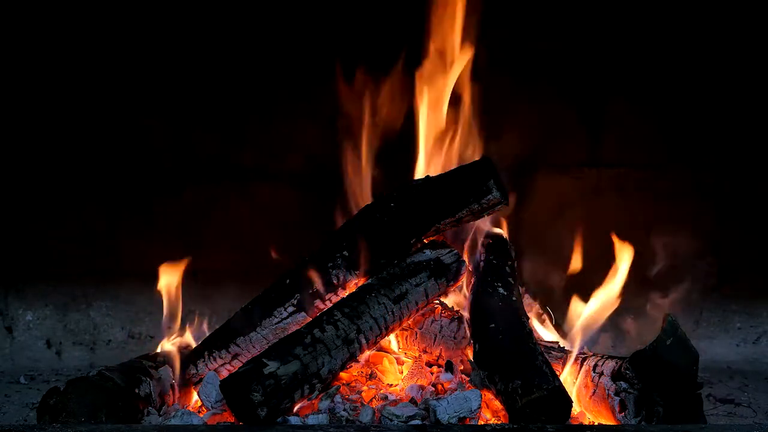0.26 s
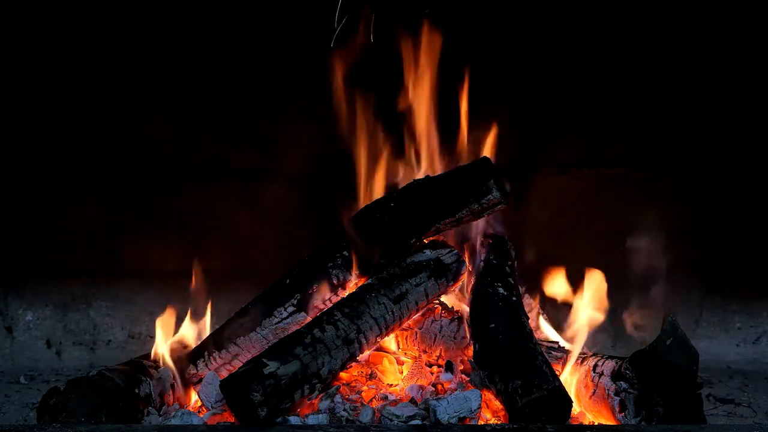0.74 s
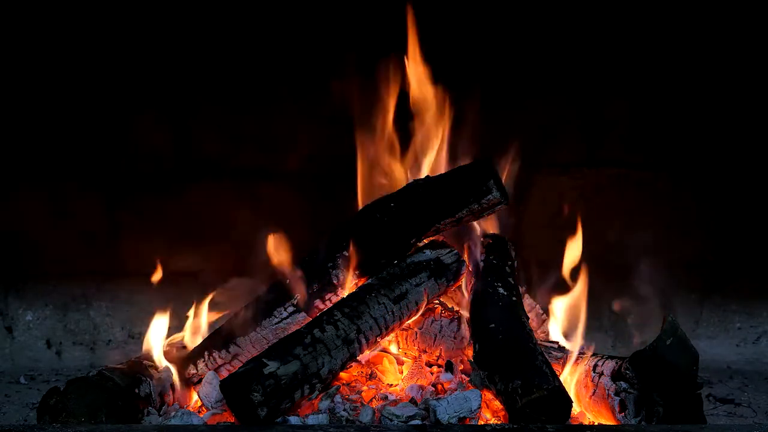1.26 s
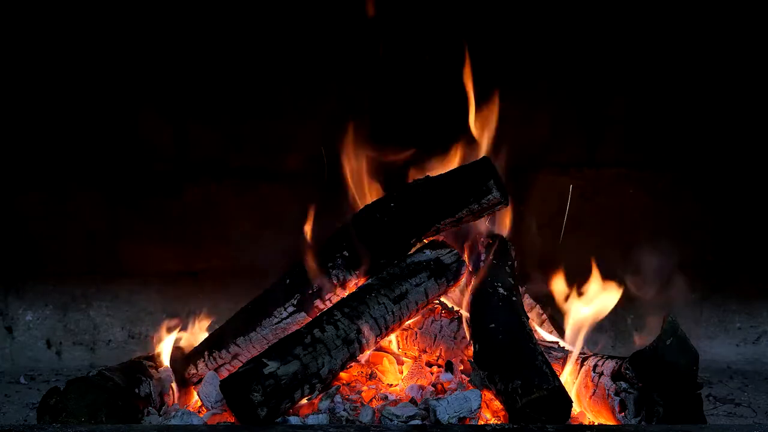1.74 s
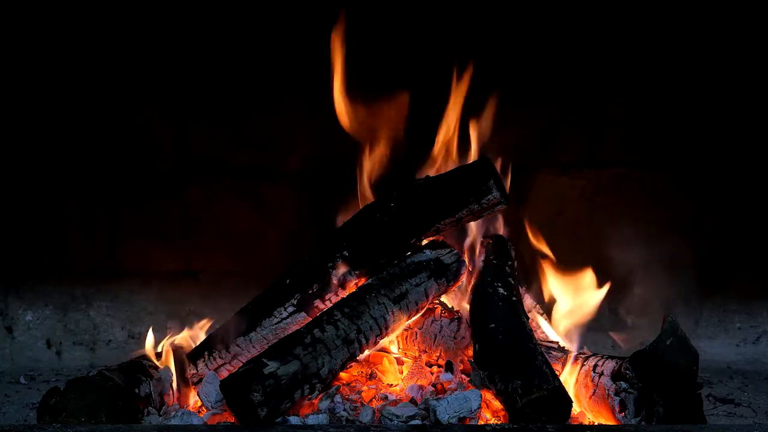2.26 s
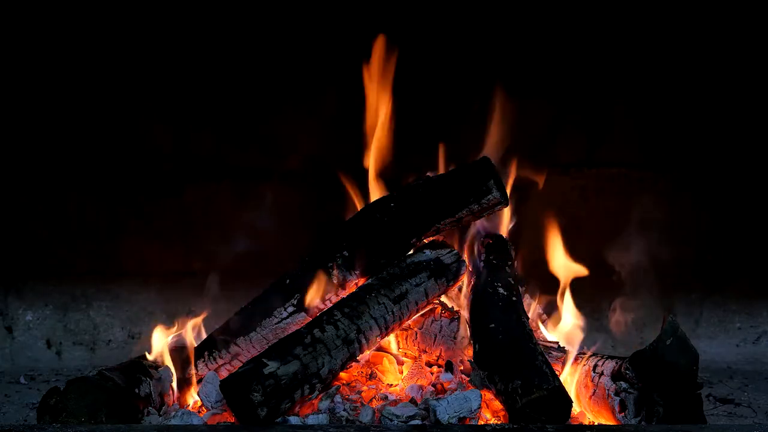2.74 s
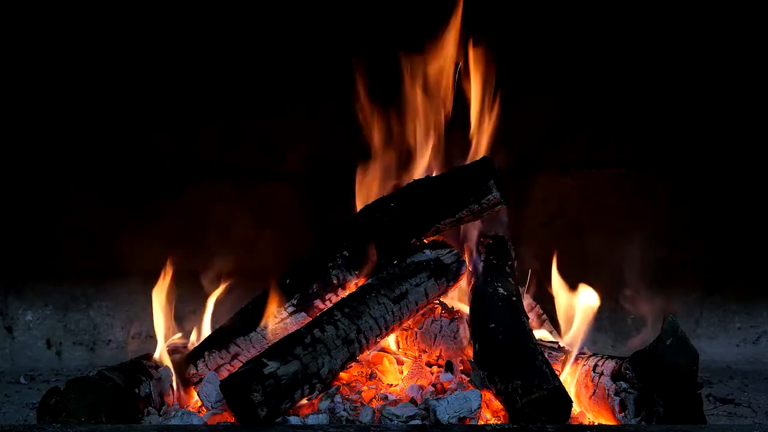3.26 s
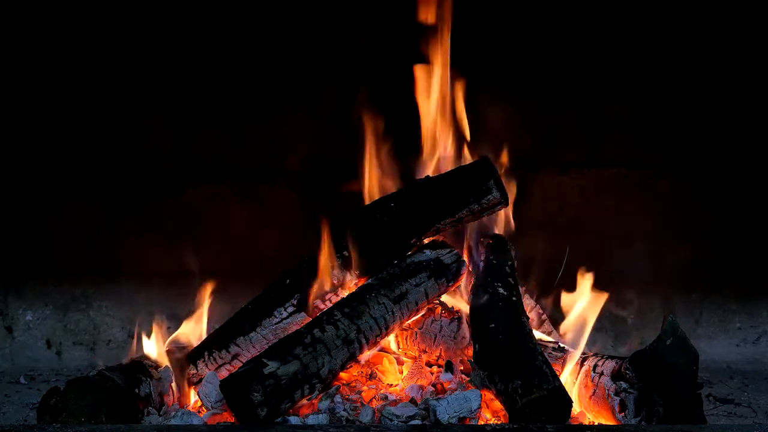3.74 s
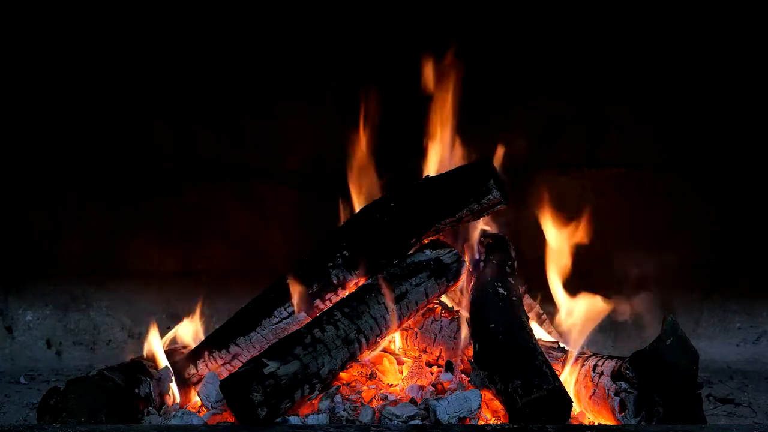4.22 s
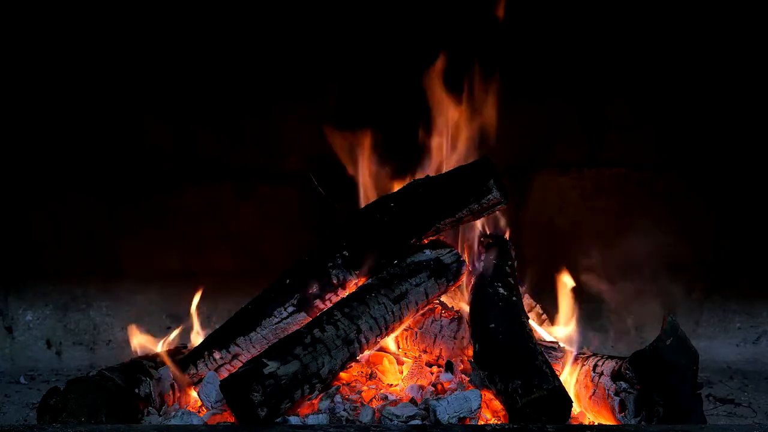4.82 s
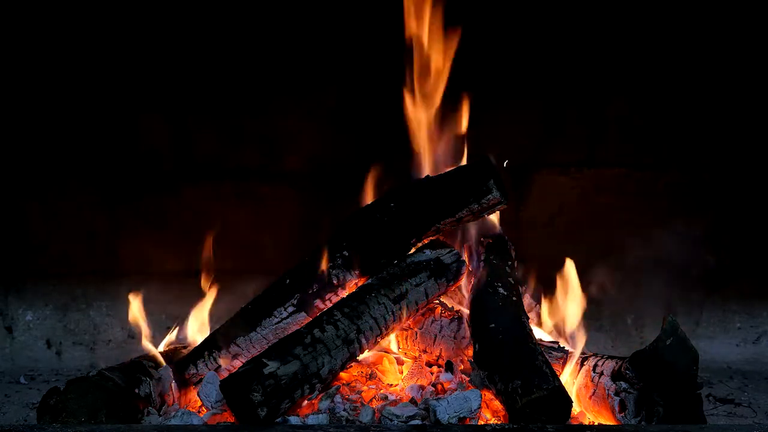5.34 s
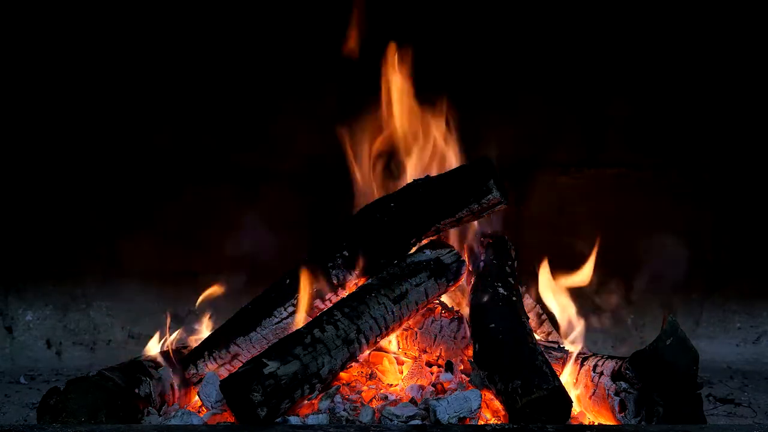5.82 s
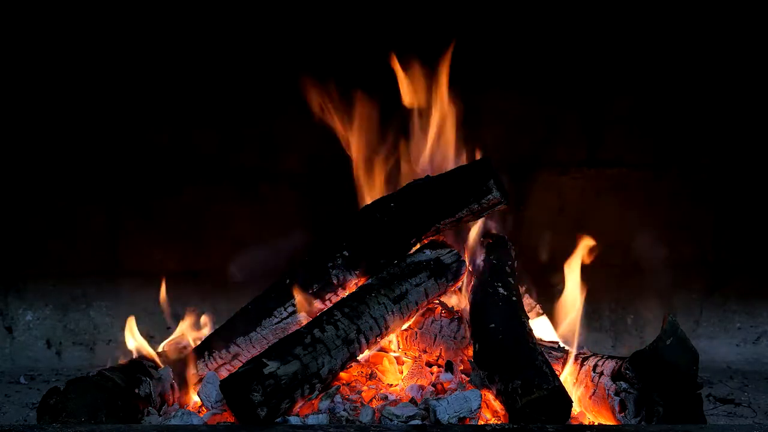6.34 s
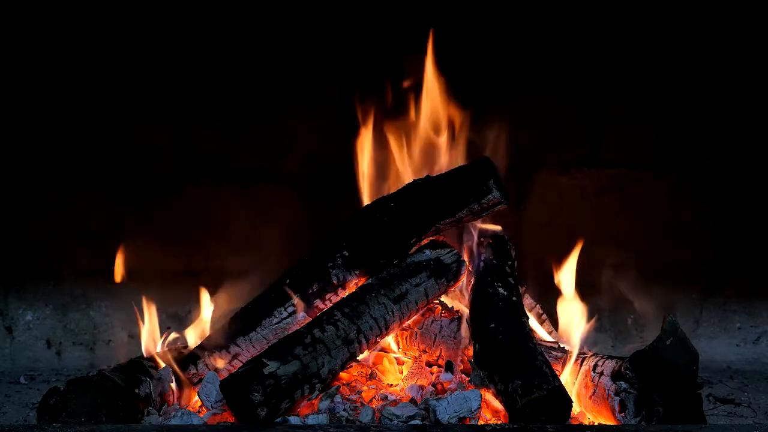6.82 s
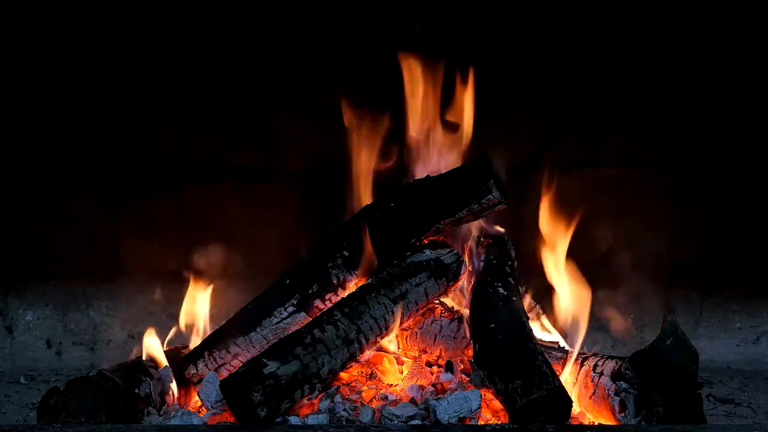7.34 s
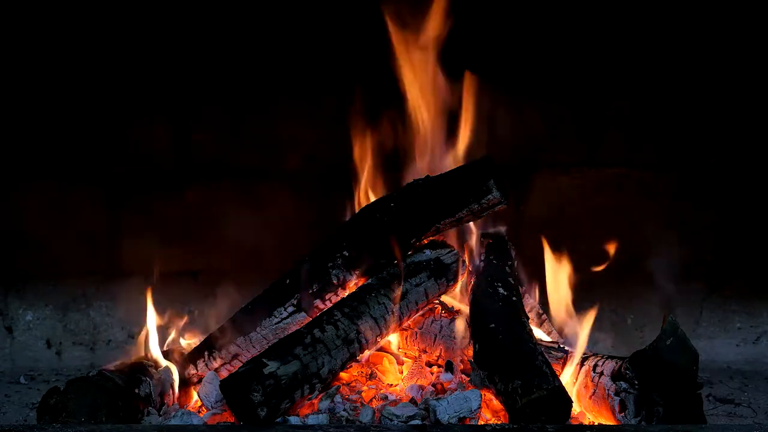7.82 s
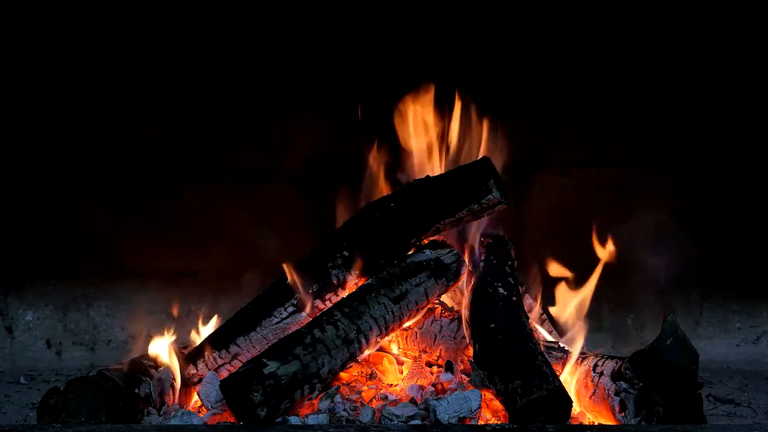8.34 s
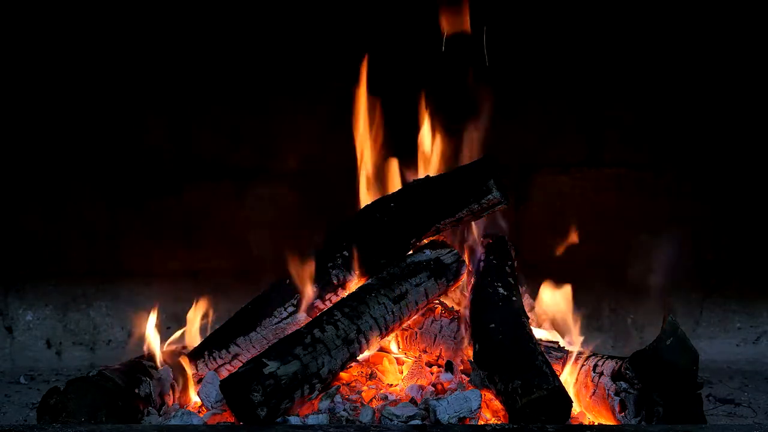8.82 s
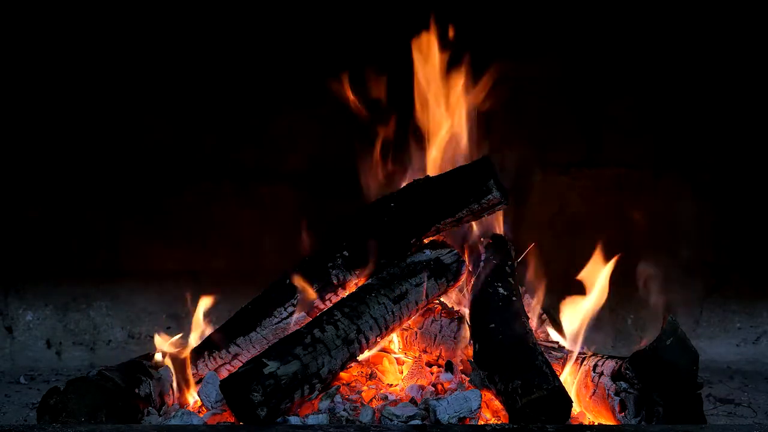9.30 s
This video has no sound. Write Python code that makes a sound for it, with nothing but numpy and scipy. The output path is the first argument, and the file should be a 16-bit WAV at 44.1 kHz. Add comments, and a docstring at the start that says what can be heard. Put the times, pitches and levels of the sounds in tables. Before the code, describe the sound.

A small indoor log fire hisses and sputters continuously, with bright snaps, a few dull pops and gentle low puffs of flame.

```python
"""Brick fireplace in a quiet room, heard from close by: damp logs burn.
Steam hisses and fizzes as coloured noise and impulses; spits of sap are short resonant noise bursts.
Pockets crack as sharp pulses through a pocket resonance and a rattling firebox; dull pops come from deeper.
Flames flutter in soft puffs that ring the low air resonances, over an even draught."""
import sys
import numpy as np
from scipy import signal
from scipy.fft import rfft, irfft
from scipy.io import wavfile
from scipy.ndimage import uniform_filter1d

SR = 44100
rng = np.random.default_rng(int(sys.argv[2]) if len(sys.argv) > 2 else 0)


def unload_wav(signal):
    """Save mono or channel-first audio to the path in sys.argv[1] as 16-bit WAV at rate SR, clipped to [-1, 1]."""
    wavfile.write(
        sys.argv[1],
        SR,
        np.round(np.clip(np.atleast_2d(signal).T, -1, 1) * 32767).astype(np.int16),
    )


N = 421596
TIME_S = np.arange(N) / SR

# bursting pockets: (time [s], rms over first 10 ms [dB], pocket pitch [Hz], pocket width [Hz],
#                    openness: direct over reflected before a common offset [dB])
POCKET_BURSTS = [(0.047, -32, 8700, 12200, -10), (0.104, -37, 7800, 5000, -6),
                 (0.263, -34, 10000, 11500, -11), (0.4104, -24, 6550, 4120, 3),
                 (0.597, -33, 7800, 6000, -5), (0.6279, -21.5, 9650, 11200, -1),
                 (0.653, -35, 7400, 4700, -8), (0.679, -26, 7100, 8000, -13), (0.8583, -22, 5600, 6960, 3),
                 (0.894, -35.5, 5600, 3000, 5), (0.944, -31.5, 6700, 11800, -14),
                 (0.958, -24.5, 7460, 5200, -1), (1.2595, -24, 7150, 4670, -4),
                 (1.3237, -25.5, 8050, 6500, 1), (1.6505, -12.5, 5240, 9900, 7.5),
                 (1.907, -35.5, 6950, 8000, -5), (2.165, -45, 7200, 3500, -3),
                 (2.264, -28.5, 5640, 5360, -12), (2.331, -32.5, 8200, 1200, -2),
                 (2.365, -34.5, 6300, 7900, -10), (2.6161, -22.5, 7900, 7000, -4),
                 (2.736, -37.5, 8000, 5000, -5), (2.7684, -38.5, 5270, 5000, -7),
                 (2.9514, -36.5, 7000, 4500, 1), (3.0445, -37, 6200, 7000, -7),
                 (3.1604, -36, 6400, 3400, -7), (3.4222, -37, 5700, 4200, -9), (3.784, -26, 7500, 6460, -2),
                 (3.9697, -40, 4800, 8000, -1), (4.2526, -28.5, 8000, 5800, -12),
                 (4.2923, -36, 6800, 2600, -8), (4.829, -36, 6500, 4000, -5),
                 (5.053, -35.5, 5800, 4700, -4), (5.137, -36, 3720, 4100, 0), (5.311, -18.5, 7260, 4900, 0),
                 (5.5057, -27, 7500, 2000, -1), (5.715, -36.5, 6000, 5000, -5),
                 (5.738, -30, 9000, 1300, -7), (5.7784, -38, 12000, 4000, -4), (5.838, -18, 7200, 7240, -3),
                 (5.874, -26.5, 7860, 6500, -2), (6.02, -30.5, 5770, 5000, 2),
                 (6.0494, -38, 8000, 5000, -4), (6.132, -35.5, 7050, 7100, -4),
                 (6.2776, -37, 7430, 2500, -5), (6.3594, -41, 11500, 5000, -4),
                 (6.3853, -38.5, 6310, 8000, -2), (6.8174, -16.5, 6700, 6400, 7.5),
                 (6.8702, -31.5, 6600, 3100, -3), (7.036, -26.5, 7200, 6500, -15),
                 (7.2125, -24.5, 11900, 13000, 1), (7.661, -35.5, 6540, 6000, -6),
                 (7.801, -37, 6540, 3500, -3), (8.247, -33.5, 9200, 5300, -2),
                 (8.2743, -29.5, 6640, 8000, 0), (8.499, -41, 9500, 9000, -3),
                 (8.616, -29.5, 9300, 6500, 0), (8.998, -38, 6500, 7000, -14), (9.345, -38, 6600, 3000, -5),
                 (9.383, -35.5, 7900, 3870, -2)]
# colour shared by all cracks: (frequency [Hz], gain [dB])
CRACK_GAIN = [(100, 8), (480, 6), (1300, -2), (3700, -1), (7500, 0.5), (12000, -3.5), (15500, -3),
              (19000, -35)]
# momentary choking of the vents: (centre time [s], length [s], depth [dB])
VENT_LULLS = [(1.998, .2, -1), (2.448, .1, -2), (2.84, 0.092, -2), (3.754, .16, -1.5), (5.677, 0.052, -3),
              (7.45, 0.22, -1)]
# colour of the steam: (frequency [Hz], relative density [dB])
STEAM_SPECTRUM = [(400, -28.5), (1050, -22.5), (1950, -17), (2150, -11.5), (2380, -17), (2660, -9.5),
                  (2850, -17.5), (3080, -8), (3350, -6), (3900, -7.5), (4800, -6.5), (5300, -4), (6900, -1),
                  (8000, 0), (9300, -5), (11000, -9), (11700, -12.5), (15400, -17.5)]
# steam leans left in its lower treble: (frequency [Hz], left minus right [dB])
STEAM_LEFT_LEAN = [(1000, 2.5), (3500, 3), (7000, 1.9), (10000, -.3), (15000, -1.5)]
# flame puffs at set times, strong to very faint:
# (time [s], peak before a common gain [dB], time scale of the push [ms])
TIMED_PUFFS = [(0.169, -29.5, 1.6), (0.408, -32.5, 0.73), (0.533, -28, 1.2), (0.803, -34, 0.7),
               (0.822, -32, 2.7), (0.886, -36, 1.6), (0.952, -30, 2), (1.081, -34, 0.87), (1.14, -43, 3.6),
               (1.42, -29, 2.8), (1.784, -28, 1.2), (1.825, -30, 3.3), (2.143, -31, 1.2),
               (2.406, -34, 0.85), (2.49, -41, 2.2), (2.599, -33, 1.1), (2.69, -33.5, 1.4),
               (2.79, -33.5, 0.73), (2.934, -28.5, 1.2), (3.04, -34, 0.79), (3.056, -29, 1.2),
               (3.263, -35, 4.1), (3.458, -30, 2.6), (3.513, -29.5, 1.24), (4.145, -27.5, 2.3),
               (4.282, -28, 2.3), (4.321, -32, 1.1), (4.74, -42, 1.7), (4.882, -22.5, 1.8),
               (4.929, -30, 1.45), (5.12, -37.5, 0.7), (5.553, -32, 0.85), (5.751, -29.5, 2.2),
               (5.792, -26.5, 1.7), (5.883, -29.5, 2.1), (5.957, -29, 1.9), (6.199, -28, 0.86),
               (6.54, -27.5, 2), (6.745, -27.5, 1.6), (6.884, -29, 2.9), (7.304, -26.5, 1.2),
               (7.454, -27, 2.2), (7.594, -24.5, 1.46), (7.661, -30.5, 2.4), (8.18, -33.5, 1.7),
               (8.211, -30.5, 1.1), (8.397, -27.5, 1.64), (8.695, -26, 1.7), (8.76, -54, 1.3),
               (9.176, -31, 1.56)]
# air resonances of the firebox: (frequency [Hz], width [Hz], gain [dB])
FIREBOX_MODES = [(48, 32, -20), (97.6, 7.9, -2), (122.2, 25.3, 2.5), (163, 56, -8.5), (242, 130, -12),
                 (365, 135, -16), (648, 64, -9), (828, 55, -10), (1200, 330, -12.5)]
# colour of the draught: (frequency [Hz], relative density [dB])
DRAUGHT_SPECTRUM = [(15, -21), (28, -22), (45, -7.5), (75, -5), (115, 1.5), (170, -5.5), (260, -12),
                    (400, -17.5), (560, -26.5), (1000, -38), (2000, -37.5)]
# dull pops deep in the pile: (time [s], peak before a common gain [dB], centre [Hz])
DEEP_POPS = [(1.491, -34, 2080), (1.619, -37, 2000), (1.785, -28.5, 2100), (2.165, -23.5, 2120),
             (2.183, -37, 900), (3.901, -30.5, 3000), (4.831, -37, 2200), (4.885, -38.5, 940),
             (5.551, -33, 1400), (6.246, -30, 2600), (6.844, -37, 2800), (7.622, -35, 2260),
             (8.73, -31.5, 2800), (8.996, -31, 2300)]
# two broad log resonances, little above: (multiple of the pop's centre [ratio], gain [dB])
LOG_KNOCK = [(.35, 1), (.6, 3.5), (.9, 1.5), (1.7, 5.5), (2.1, -7.5), (4, -18)]

# faint cracks at random times
FAINT_CRACKS_PER_S, FAINT_CRACK_DB, FAINT_CRACK_HZ, FAINT_CRACK_WIDTH_HZ = 1.0, -44, 7200, 6000
# gain of the even steam flow and its changes; vent gain is added to each burst's level
STEAM_FLOW_DB, STEAM_RISE_DB_PER_S, STEAM_DRIFT_DB = -40.5, 0.0375, 0.06
VENT_GAIN_DB, VENT_DECAY_S = -36.5, 0.1
# bubbles at each log end: rate, mean size above the smallest before the cap, size cap
FIZZ_PER_S, FIZZ_SPREAD_DB, FIZZ_MOST_DB = 200, 2.4, 10.5
# spits of sap: mid peak and pitch, each with a spread either way
SPITS_PER_S, SPIT_DECAY_S, SPIT_DB, SPIT_SPREAD_DB = 34, .003, -33.5, 4.5
SPIT_HZ, SPIT_OCTAVES, SPIT_WIDTH_HZ = 7850, .65, 1800
# gain of the flame roar and its swelling
FLAME_GAIN_DB, FLAME_SWELL_DB, FLAME_SWELLS_PER_S = -41.5, 1.06, 7
# further puffs at random times: mid peak before the common gain, mid time scale
RANDOM_PUFFS_PER_S, RANDOM_PUFF_DB, RANDOM_PUSH_MS = 1.0, -36.5, 1.16
FIREBOX_T60_S, HEARTH_DELAY_S, HEARTH_DB = 0.042, .022, -20.5
TOP_HZ = 15500


def cracks(direct_offset_db=-3.0, left_db=0.5, faint_spread_db=3, faint_octaves=0.4, faint_open_db=-6):
    """Each pocket bursts in a sharp pulse through its own broad resonance: low pockets snap, high ones ping."""
    bursts = list(POCKET_BURSTS)
    for s, loud, high in scatter(FAINT_CRACKS_PER_S, size=2):
        db = FAINT_CRACK_DB + faint_spread_db * loud
        hz = FAINT_CRACK_HZ * 2 ** (faint_octaves * high)
        bursts.append((s, db, hz, FAINT_CRACK_WIDTH_HZ, faint_open_db))
    out = np.zeros((2, N))
    for s, db, pocket_hz, width_hz, open_db in bursts:
        response = firebox(open_db + direct_offset_db, lag=1)
        snap = resonate(splinters(response), pocket_hz, width_hz)
        burst = colour(charcoal(snap, pocket_hz), CRACK_GAIN, size=512)
        rms_10ms = np.sqrt(np.mean(burst[:, :SR // 100] ** 2))
        add(out, s, burst * undb(db) / rms_10ms)
    return out * pan(left_db)


def splinters(burst, follow_db=-9, spread_ms=3.2, count=5):
    """Weaker snaps of single fibres, treble only, follow the first break within milliseconds."""
    out = burst.copy()
    treble = burst - signal.lfilter([.4], [1, -.6], burst)
    for when, sign in rng.random((count, 2)):
        late = 1 + int(when * spread_ms * SR / 1000)
        gain = np.sign(sign - .5) * undb(follow_db) * (1 - when / 2)
        out[:, late:] += gain * treble[:, :-late]
    return out


def charcoal(snap, pocket_hz, ring_db=-10, ring_width_hz=420, octaves=0.35, count=2):
    """The charred crust clinks briefly with a few tones near the pocket's pitch."""
    tones_hz = np.minimum(pocket_hz * 2 ** (octaves * rng.uniform(-0.84, 1, count)), TOP_HZ)
    return snap + undb(ring_db) * sum(resonate(snap, hz, ring_width_hz) for hz in tones_hz)


def steam(hiss_db=1.0, fizz_db=-5.0, tick_db=-14, count=3):
    """Vents hiss as wavering noise; sap fizz and ember ticks are random impulses; one flow scales all."""
    hiss, fizz, ticks = np.zeros((3, 2, N))
    for k in range(count):
        waver_db = 1.03 * walk(7.9) + 1.15 * walk(140)
        hiss += in_firebox(rng.standard_normal(N) * undb(waver_db), -5.5, lag=4)
        bubbles = sparks(FIZZ_PER_S, FIZZ_SPREAD_DB, FIZZ_MOST_DB) * undb(1.5 * walk(25))
        fizz += in_firebox(bubbles, 0.44, lag=k + 2)
        ticks += in_firebox(sparks(8.7, 2.8, 9.0), 0.92, lag=k)
    # the narrowest jet comes and goes, so the hiss brightens and dulls
    hiss = (hiss + 0.14 * walk(7.4) * resonate(hiss, 8300, 1900)) * vents_open()
    parts = ((hiss, hiss_db), (fizz, fizz_db), (ticks, tick_db))
    sound = steam_flow() * sum(level(colour(part, STEAM_SPECTRUM), db) for part, db in parts)
    return irfft(rfft(sound) * pan(on_bins(STEAM_LEFT_LEAN, N)), N)


def steam_flow():
    """Flow grows as the logs heat, drifts a little, surges with each listed burst's strength and decays."""
    vented = np.zeros(N)
    for s, db, *_ in POCKET_BURSTS:
        vented[int(s * SR)] += undb(db + VENT_GAIN_DB)
    even = undb(STEAM_FLOW_DB + STEAM_RISE_DB_PER_S * TIME_S + STEAM_DRIFT_DB * walk(2.3))
    return even + signal.lfilter([1], [1, -np.exp(-1 / (VENT_DECAY_S * SR))], vented)


def vents_open():
    """Gain of the hiss: it dips while sap blocks a vent, until blown clear."""
    dips_db = sum(db * np.exp(-np.abs(2 * (TIME_S - s) / length_s) ** 4) for s, length_s, db in VENT_LULLS)
    return undb(dips_db)


def spits():
    """Sap boils over in brief decaying noise, each spit at its own pitch, some near, some deep in the pile."""
    out = np.zeros((2, N))
    age = TIME_S[:SR // 20] / SPIT_DECAY_S
    for s, loud, high, near in scatter(SPITS_PER_S, size=3):
        hz = SPIT_HZ * 2 ** (SPIT_OCTAVES * high)
        spit = resonate(rng.standard_normal(len(age)) * np.exp(-age), hz, SPIT_WIDTH_HZ)
        heard = signal.fftconvolve(spit[None], firebox(4 * near, lag=2, size=2048), axes=1)
        add(out, s, heard * undb(SPIT_DB + SPIT_SPREAD_DB * loud) / np.abs(heard).max())
    return out


def flames():
    """Roar and puffs; long waves reach both channels alike, shorter ones differ after the walls."""
    blaze = undb(FLAME_GAIN_DB + FLAME_SWELL_DB * walk(FLAME_SWELLS_PER_S))
    # independent roar in opposite polarity left and right
    side = colour(blaze * roar(), [(60, -15.0), (130, -20.0), (300, -9.5), (700, -8.0), (1500, 5)])
    sound = blaze * roar() + puffs() + side * np.array([[1], [-1]])
    left_lean = [(90, 0.2), (300, 1.5), (600, 3.7)]
    return irfft(rfft(sound) * pan(on_bins(left_lean, N)), N)


def puffs(gain_db=-0.5, random_spread_db=6.0, random_octaves=0.66, size=4096):
    """Gas pockets ignite with one soft push of air each; a shorter push has more upper bass."""
    events = list(TIMED_PUFFS)
    for s, loud, slow in scatter(RANDOM_PUFFS_PER_S, size=2):
        db = RANDOM_PUFF_DB + random_spread_db * loud
        events.append((s, db, RANDOM_PUSH_MS * 2 ** (random_octaves * slow)))
    out = np.zeros((1, N))
    t = TIME_S[:size]
    for s, db, push_ms in events:
        age = 1000 * t / push_ms
        push = np.gradient(age ** 3 * np.exp(-2 * age))
        rough = uniform_filter1d(rng.standard_normal(size), size=32)
        tearing = rough * np.exp(-t / 0.013) * np.minimum(age, 1)
        puff = air(tearing - push / push.max())
        add(out, s - .002, puff[None] * undb(db + gain_db) / np.abs(puff).max())
    return out


def roar(flutter_db=-2.5, draught_db=-4.5, ignitions_per_s=160):
    """Many small ignitions flutter (impulses ringing the air) over the draught's even noise."""
    ignitions = sparks(ignitions_per_s, 3.4, 11.6) * undb(1.54 * walk(20))
    flicker_gain = [(100, 7.5), (400, -0.5), (560, -8.0), (800, -8.5), (2000, -35.0), (6000, -19)]
    flicker = colour(ignitions[None], flicker_gain)
    draught = colour(rng.standard_normal((1, N)) * undb(1.1 * walk(11)), DRAUGHT_SPECTRUM)
    return level(air(flicker), flutter_db) + level(draught, draught_db)


def air(x):
    """Pressure from the flames rings the air in the firebox."""
    return sum(undb(db) * resonate(x, hz, width_hz) for hz, width_hz, db in FIREBOX_MODES)


def pops(gain_db=1, width_ratio=2.3, direct_db=-7, left_db=2):
    """Bursts behind the logs arrive muffled, mostly by reflection."""
    out = np.zeros((2, N))
    for s, db, hz in DEEP_POPS:
        pop = resonate(firebox(direct_db, lag=2), hz, hz * width_ratio)
        pop = colour(pop, [(ratio * hz, gain) for ratio, gain in LOG_KNOCK], size=512)
        add(out, s, pop * undb(db + gain_db) / np.abs(pop).max())
    return out * pan(left_db)


def firebox(direct_db, lag, room_db=-32, room_t60_s=1.0, uneven_db=1.1, size=8192):
    """Stereo response of one spot: direct (left lag samples late), brick rattle, hearth echoes, faint room."""
    t = TIME_S[:size]
    echoes = rng.standard_normal((2, size)) * undb(uneven_db * rng.standard_normal((2, size)))
    rattle = undb(-60 * t / FIREBOX_T60_S)
    # the far side of the hearth returns a second, softer cluster
    hearth = (t > HEARTH_DELAY_S) * undb(HEARTH_DB - 60 * np.abs(t - HEARTH_DELAY_S) / FIREBOX_T60_S)
    echoes *= rattle + hearth + undb(room_db - 60 * t / room_t60_s)
    response = echoes / np.sqrt(np.sum(echoes ** 2, axis=1, keepdims=True))
    response[[0, 1], [lag, 0]] += undb(direct_db)
    # rough bricks scatter all pitches alike, so no broad band stands out
    spectrum = rfft(response)
    even = irfft(spectrum / np.sqrt(uniform_filter1d(np.abs(spectrum) ** 2, size=100)))
    return even * (1 - t / t[-1])


def in_firebox(x, direct_db, lag):
    """A source as it reaches both channels from its own spot."""
    return signal.fftconvolve(x[None], firebox(direct_db, lag), axes=1)[:, :N]


def scatter(per_s, size):
    """Random events: rows of a time [s], then size chances from -1 to 1."""
    rows = rng.random((int(per_s * N / SR) + 1, 1 + size))
    return np.column_stack([rows[:, 0] * N / SR, 2 * rows[:, 1:] - 1])


def sparks(per_s, spread_db, most_db):
    """Impulses at random times and polarity: many small, a few large."""
    sizes = undb(np.minimum(spread_db * rng.exponential(size=N), most_db))
    return (rng.random(N) < per_s / SR) * sizes * rng.choice([-1, 1], N)


def walk(rate_hz):
    """Random levels held 1 / rate_hz and smoothed twice; spread near 1."""
    k = int(SR / rate_hz)
    held = np.repeat(rng.standard_normal(N // k + 1), k)
    return 1.3 * uniform_filter1d(uniform_filter1d(held, k), k)[:N]


def resonate(x, hz, width_hz):
    """Two-pole band-pass, gain 1 at the centre."""
    return signal.lfilter(*signal.iirpeak(hz, hz / width_hz, fs=SR), x)


def on_bins(points, size):
    """(frequency [Hz], level [dB]) points joined on a log-frequency axis."""
    hz, db = np.transpose(points)
    bins_hz = np.arange(size // 2 + 1) * SR / size
    return np.interp(np.log(bins_hz + 1), np.log(hz), db)


def colour(x, points, size=8192):
    """Causal filter with the given spectrum, built from its cepstrum."""
    cepstrum = irfft(np.log(undb(on_bins(points, size))))
    cepstrum[1:size // 2] *= 2
    cepstrum[size // 2 + 1:] = 0
    response = irfft(np.exp(rfft(cepstrum)))
    return signal.fftconvolve(x, response[None], axes=1)[:, :x.shape[1]]


def undb(db):
    """Decibels to gain."""
    return 10 ** (np.asarray(db) / 20)


def level(x, db):
    """Scale to an rms level."""
    return x * undb(db) / np.sqrt(np.mean(x ** 2))


def pan(db):
    """Left and right gains for a level difference."""
    return undb(np.array([[1], [-1]]) * db / 2)


def add(out, s, sound):
    """Mix a short sound in at time s."""
    i = int(np.clip(s * SR, 0, N - 1))
    out[:, i:i + sound.shape[1]] += sound[:, :N - i]


def scene():
    """The whole fire."""
    return cracks() + steam() + spits() + flames() + pops()


def record(dry):
    """Round the sharpest peaks and cut the top."""
    rounded = .55 * np.tanh(dry / .55)
    return signal.sosfilt(signal.ellip(10, .2, 70, TOP_HZ, fs=SR, output="sos"), rounded)


dry = scene()
out = record(dry)
unload_wav(out)
```